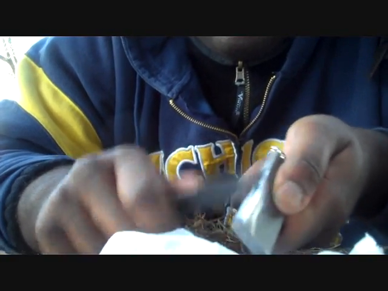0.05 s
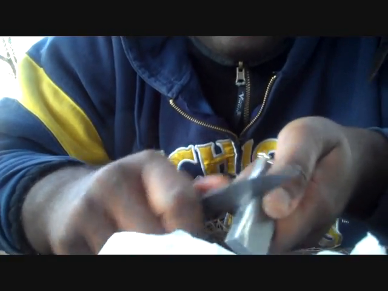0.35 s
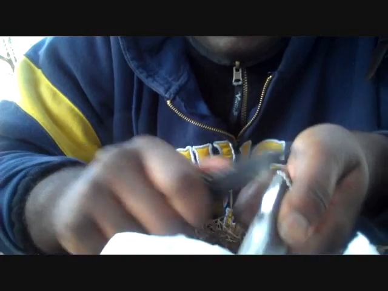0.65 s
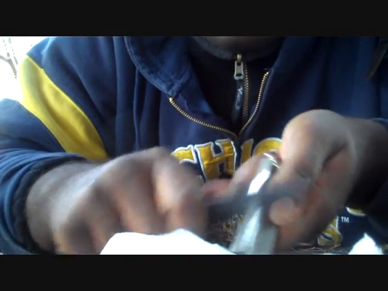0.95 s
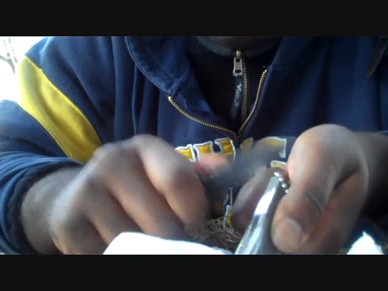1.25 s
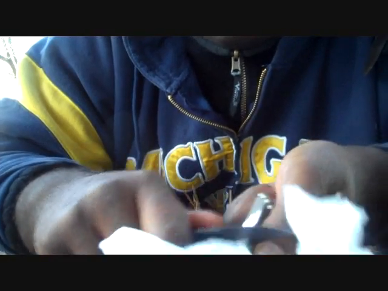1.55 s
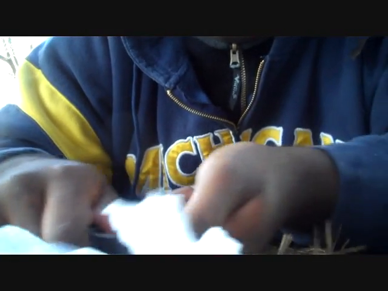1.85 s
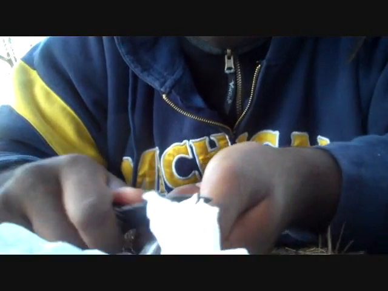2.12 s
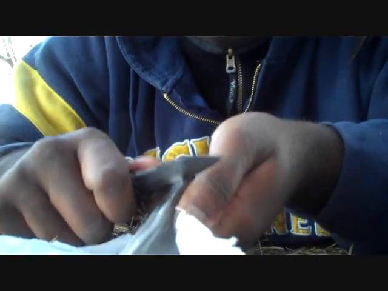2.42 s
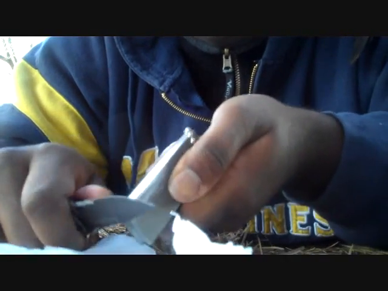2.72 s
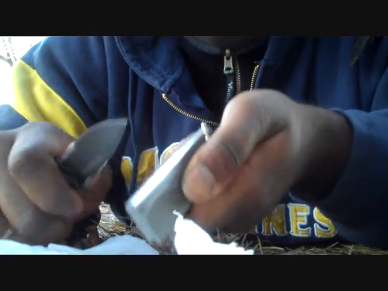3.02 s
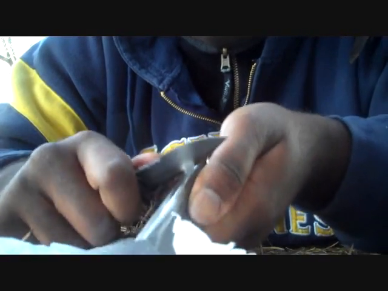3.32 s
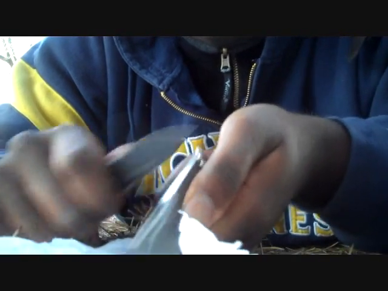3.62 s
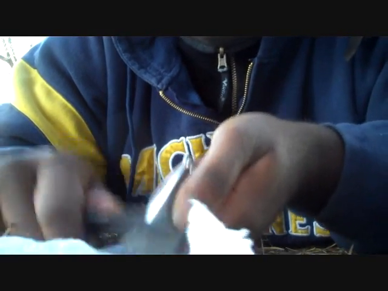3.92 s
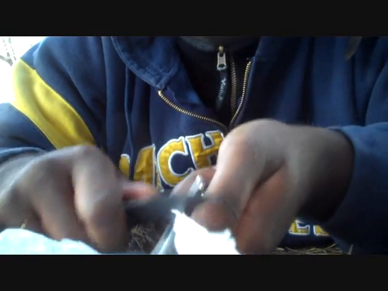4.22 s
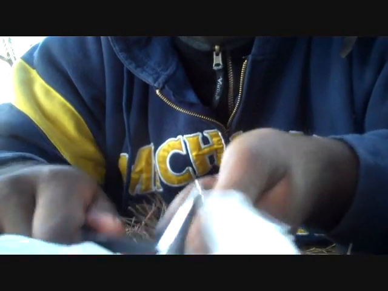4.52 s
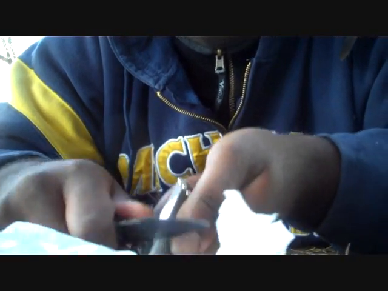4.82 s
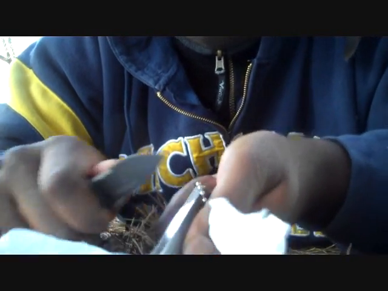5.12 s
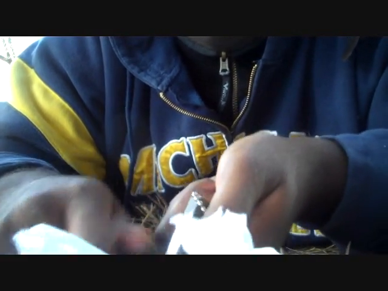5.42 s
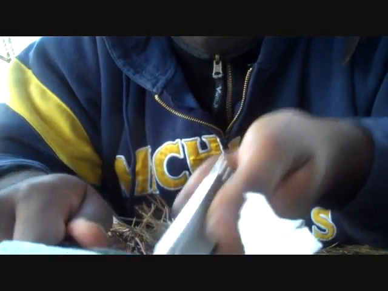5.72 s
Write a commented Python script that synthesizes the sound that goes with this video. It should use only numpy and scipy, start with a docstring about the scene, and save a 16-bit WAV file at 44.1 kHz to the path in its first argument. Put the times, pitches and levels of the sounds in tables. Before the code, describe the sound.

Quick, bright rasps of a knife shaving a metal block alternate with hard metallic taps and tiny high squeaks. Paper crinkles and cloth rustles in a short break, then the strokes return, growing more frequent, with lighter rustling around them. Everything is near a small stereo microphone, and the loudest hits distort slightly. Behind it lie soft open air and the low hum of a far engine.

```python
"""A knife shaves a hand-held magnesium block outdoors, close to a small stereo microphone.
From the start the blade scrapes in stick-slip jerks over a far engine and soft air noise.
From 0.3 s it clacks on the block between strokes and squeals on deep bites; ground and trees scatter it.
Paper and sleeves rustle, most near 1.9 s; at 2.4 s the engine has stepped up in pitch.
Strokes go on to 5.6 s, closer together late on. The loudest peaks overload and duck the gain."""
import sys
import numpy as np
from scipy import signal
from scipy.fft import rfft, irfft
from scipy.io import wavfile
from scipy.ndimage import uniform_filter1d, minimum_filter1d

SR = 44100
rng = np.random.default_rng(int(sys.argv[2]) if len(sys.argv) > 2 else 0)


def persist_wave(psi):
    """Save psi, clipped to +-1, as 16-bit WAV."""
    counts = np.round(np.clip(psi, -1, 1) * 32767).astype(np.int16)
    wavfile.write(sys.argv[1], SR, np.atleast_2d(counts).T)


N = 253575
TIME = np.arange(N) / SR


def undb(db):
    """Decibels to gain."""
    return 10 ** (np.asarray(db) / 20)


def unit(x):
    """Scale to rms 1."""
    return x / np.sqrt(np.mean(x ** 2))


def add(track, start_s, sound):
    """Mix a sound in at start_s."""
    start = max(int(start_s * SR), 0)
    track[..., start:start + sound.shape[-1]] += sound[..., :N - start]


def band(x, hz, width_hz):
    """One resonance, gain 1 at centre."""
    return signal.lfilter(*signal.iirpeak(hz, hz / width_hz, fs=SR), x)


def colour(x, points, size=4096):
    """Minimum-phase filter through points of freq_hz, gain_db."""
    hz, db = np.transpose(points)
    grid_hz = np.maximum(np.fft.rfftfreq(size, 1 / SR), 1)
    gain = undb(np.interp(np.log(grid_hz), np.log(hz), db))
    cepstrum = irfft(np.log(gain))
    cepstrum[1:size // 2] *= 2
    cepstrum[size // 2 + 1:] = 0
    return signal.fftconvolve(x, irfft(np.exp(rfft(cepstrum))))[:len(x)]


def walk(rate_hz):
    """Smooth random drift, rms 1."""
    hold = max(int(SR / rate_hz), 1)
    steps = np.repeat(rng.standard_normal(N // hold + 1), hold)
    return unit(uniform_filter1d(steps, hold)[:N])


def grains(rate_hz, spread_db):
    """Tiny random impacts of uneven size, rms 1."""
    size = undb(spread_db * np.clip(rng.standard_normal(N), -2, 2))
    return unit((rng.random(N) < rate_hz / SR) * size * rng.choice([-1, 1], N))


def ring(x, modes, widen=1.04):
    """Drive steep two-stage resonances; rms 1."""
    return unit(sum(undb(db) * band(band(x, hz, widen * width_hz), hz, widen * width_hz)
                    for hz, width_hz, db in modes))


def pressure(rise_s, fall_s, light_db, end_db=17.5, lift_s=0.0086):
    """One stroke: contact slack below the deepest bite, and the lift-off fade."""
    t = np.arange(int((rise_s + fall_s) * SR)) / SR
    approach_db = light_db * np.maximum(1 - t / rise_s, 0) ** 1.7
    run_out_db = end_db * np.maximum((t - rise_s) / fall_s, 0) ** 1.5
    return approach_db + run_out_db, np.minimum((t[-1] - t) / lift_s, 1)


def scrapes(flex_db=-1, edge_db=1, shavings_db=-14, snag_db=-8, apart_db=-12):
    """The edge sticks, slips and snags on ridges; each slip rings the blade and tears off metal."""
    # blade strokes: start_s, rise_s, fall_s, level_db, light_start_db, flex_rel_db, edge_share_db
    strokes = [(0.0, .003, 0.021, -18, -1, -7, -4.5), (0.08, 0.019, 0.042, -25.5, 6, -3, -4.5),
               (0.407, .07, 0.036, -13, 19.5, -16, -9), (0.564, 0.028, .011, -14, 17, -0.5, -3),
               (1.013, 0.051, 0.046, -15.5, 7.5, -17.5, -8.5), (1.618, 0.028, 0.041, -19, 21, -9.5, -4),
               (2.628, 0.076, 0.041, -12, 14, -17, -7.5), (3.494, 0.037, 0.04, -8, 18.5, -31, -7),
               (3.805, 0.03, 0.026, -19.5, 28, -6, -10), (3.933, 0.026, 0.065, -17.5, 0.5, -10, -7.5),
               (4.125, 0.0012, 0.065, -20, -2, -7.5, -13), (4.326, 0.058, 0.019, -19, 17, -11, -3),
               (4.46, 0.048, 0.034, -19, 12, -13.5, -5.5), (4.793, 0.069, 0.045, -15.5, 24, -12, -6),
               (4.958, 0.056, 0.033, -15.5, 13, -13, -2.5), (5.112, 0.0017, 0.022, -22, 2, -14, 0),
               (5.391, 0.0018, 0.022, -20.5, 0, -7, -3.5), (5.491, 0.061, 0.022, -19, 18.5, -13, -5)]
    # blade resonances while cutting: freq_hz, nominal_width_hz, level_db
    flex_modes = [(1745, 150, 9.5), (1820, 200, 4)]
    body_modes = [(3400, 600, -13), (4020, 690, 2.5), (4300, 410, 3), (5190, 410, 2), (5974, 220, 6)]
    edge_modes = [(7250, 670, 0.0037), (7010, 820, 0.0078)]
    # hiss of tearing shavings: freq_hz, gain_db
    hiss_colour = [(300, -13), (1200, 2.5), (2500, 11), (6000, -1), (8500, -3), (10000, -1), (14000, -6.5)]
    jerks = undb(2.8 * walk(rate_hz=400))
    shared = grains(rate_hz=2200, spread_db=1.0) * jerks
    shared += undb(snag_db) * grains(rate_hz=51, spread_db=2.5)
    slips = shared + undb(apart_db) * jerks * rng.standard_normal((2, N))  # ports differ slightly
    flex, body, edge = ring(slips, flex_modes), ring(slips, body_modes), ring(slips, edge_modes)
    hiss = np.sqrt(jerks) * rng.standard_normal((2, N))
    shavings = unit(np.array([colour(port, hiss_colour) for port in hiss]))
    out = np.zeros((2, N))
    for start_s, rise_s, fall_s, db, light_db, flex_rel_db, share_db in strokes:
        slack_db, lift = pressure(rise_s, fall_s, light_db)
        here = int(start_s * SR) + np.arange(len(slack_db))
        bite_db = db - slack_db
        # light contact favours edge and flex; deep bites tear more metal
        edge_share = np.minimum(undb(share_db + 0.25 * slack_db), .9)
        body_share = np.sqrt(1 - edge_share ** 2)
        blade = body_share * body[:, here] + undb(edge_db) * edge_share * edge[:, here]
        bending = undb(flex_db + flex_rel_db + 0.26 * slack_db) * flex[:, here]
        tearing = undb(shavings_db + 0.1 * (bite_db + 18)) * shavings[:, here]
        add(out, start_s, lift * undb(bite_db) * (blade + bending + tearing))
    return out


def afterring(x, level_db=-14):
    """One lightly damped blade mode sings on after each stroke."""
    return undb(level_db) * band(x, hz=4170, width_hz=7)


def hands(x, level_db=-14, count=110):
    """Faint reflections off hands and sleeves, within 2.5 ms."""
    echoes = rng.standard_normal(count) * np.hanning(count)
    return undb(level_db) * signal.fftconvolve(x, echoes / np.linalg.norm(echoes))[:N]


def surroundings(x, level_db=-29, delay_s=.012, slow_t60_s=0.34, fast_t60_s=0.07, count=16000):
    """Ground and trees scatter a thin, late tail."""
    t = np.arange(count) / SR
    tail = band(rng.standard_normal(count), hz=3800, width_hz=3300) * (t > delay_s)
    tail *= undb(-60 * t / slow_t60_s) + 0.7 * undb(-60 * t / fast_t60_s)
    return undb(level_db) * signal.fftconvolve(x, tail / np.linalg.norm(tail))[:N]


def engine():
    """Far engine: two wavering harmonics of the firing rate."""
    # engine drone: time_s, firing_hz, first_harmonic_db, second_harmonic_db
    drone = [(0, 73, -48, -53.5), (.85, 74, -46.5, -42), (1.4, 74, -48, -53), (2.3, 74, -47, -58),
             (2.4, 98, -49, -54), (3.3, 98, -45.5, -53.5), (3.7, 98, -43, -55), (4.6, 98, -44.5, -62),
             (5.75, 99, -53, -79)]
    time_s, *columns = np.transpose(drone)
    firing_hz, first_db, second_db = (np.interp(TIME, time_s, column) for column in columns)
    phase = 2 * np.pi * np.cumsum(firing_hz * (1 + 0.0251 * walk(rate_hz=22))) / SR
    first = undb(first_db + 1.3 * walk(rate_hz=12)) * np.sin(phase)
    second = undb(second_db + 2 * walk(rate_hz=24)) * np.sin(2 * phase)
    return np.sqrt(2) * (first + second)


def air(level_db=-42, side_db=-8):
    """Soft, steady outdoor noise, mostly alike in both channels."""
    # open-air spectrum: freq_hz, gain_db
    air_colour = [(15, -33.5), (25, -22), (87, 1.5), (168, -7.5), (257, -11), (540, -11), (868, -8),
                  (1400, -17), (2080, -20.5), (3000, -28.5), (6000, -30.5), (9000, -39), (14000, -45)]
    mid, side = (unit(colour(rng.standard_normal(N), air_colour)) for _ in range(2))
    return undb(level_db + 0.5 * walk(rate_hz=16)) * (mid + undb(side_db) * np.array([side, -side]))


def strike(t60_s, flex_db, crack_db, count=2200):
    """One blow on the hand-damped modes, with a crack of contact noise."""
    # modes of blade and block pressed together: freq_hz, level_db
    contact_modes = [(1770, -17.5), (2850, -14.5), (3420, -12), (4280, -15.5), (4850, -17.5), (5850, -3),
                     (6750, -4.5), (7450, -12.5)]
    t = np.arange(count) / SR
    hz, db = np.transpose(contact_modes)
    hz = hz * (1 + 0.027 * rng.standard_normal(len(hz)))
    db[0] += flex_db  # lowest mode: blade flex
    weights = undb(db) * rng.choice([-1, 1], len(hz))
    modes = weights @ np.sin(2 * np.pi * np.outer(hz, t))
    crack = undb(crack_db) * unit(band(rng.standard_normal(count), hz=7500, width_hz=4200))
    return (modes + crack) * undb(-60 * t / t60_s)


def catches(level_db=-6, skid_db=-9, skid_decay_s=0.00039, count=220):
    """The edge taps the block or snags on a ridge, then skids briefly."""
    # light touches and hard snags: start_s, level_db, flex_rel_db
    touches = [(0.1096, -7, 13), (0.4781, -5, 14), (0.5014, -5, 4), (0.5855, -9, -13), (0.593, -13, -4),
               (0.9784, -6.5, 11), (2.2313, 1, 2), (2.626, -1.5, -8), (2.6362, 4, 0), (2.6438, -2, -8),
               (3.014, -5.5, 9.5), (3.0227, -10, 7), (3.493, 2, 1.5), (3.9426, -27, -8),
               (4.0519, -19, 17.5), (4.3912, -11, 19), (4.512, 3.5, 11.5), (5.3916, -6, 3),
               (5.457, -5, -10), (5.5558, 1, 6)]
    out, fade = np.zeros(N), np.exp(-np.arange(count) / SR / skid_decay_s)
    for start_s, db, flex_db in touches:
        force = undb(skid_db) * fade * rng.standard_normal(count) * (rng.random(count) < .1)
        force[0] = 1  # first contact
        blow = strike(t60_s=0.011, flex_db=flex_db, crack_db=-18)
        add(out, start_s, undb(db + level_db) * np.convolve(force, blow))
    return out


def clacks(ring_db=-2, modes_db=-1, count=2200):
    """The blade lands hard; the contact point decides which mode rings most."""
    # landings on the block: start_s, level_db, ring_hz, t60_s
    landings = [(0.2926, 14, 6030, 0.0077), (0.7918, 12.5, 5820, 0.0067), (1.4028, 13, 6125, 0.0082),
                (2.8631, 8, 7650, 0.0053), (3.2356, 3, 3280, 0.0082), (3.7888, 13, 5810, 0.0061),
                (4.1243, 1, 4460, 0.011), (4.76, 14.5, 6090, 0.0045), (5.1096, 2.5, 6670, 0.013),
                (5.3255, 5.5, 6020, 0.0091)]
    out, t = np.zeros(N), np.arange(count) / SR
    for start_s, db, ring_hz, t60_s in landings:
        strongest = undb(ring_db) * np.sin(2 * np.pi * ring_hz * t) * undb(-60 * t / t60_s)
        blow = undb(modes_db) * strike(t60_s, flex_db=1.5, crack_db=-10)
        add(out, start_s, undb(db) * (strongest + blow))
    return out


def squeals():
    """Deep bites lock the slips to one mode; the pitch bends, mostly up, as the edge breaks free."""
    # edge chatter: start_s, length_s, start_hz, end_hz, level_db
    chatter = [(0.402, 0.075, 6060, 5930, -19.5), (1.031, 0.021, 4326, 4420, -11.5),
               (1.069, 0.0029, 4470, 5070, 4.5), (1.074, 0.0068, 5240, 6360, -3),
               (2.673, 0.011, 4220, 4330, -6), (2.682, 0.0122, 4180, 4690, 5),
               (3.521, 0.01286, 4145, 4500, 1.5), (3.543, 0.0077, 4100, 4750, -4),
               (3.956, 0.026, 4220, 4350, -10), (3.97, 0.015, 4550, 6200, -11.5),
               (4.129, 0.048, 3300, 3530, -22.5), (4.496, 0.027, 5990, 6500, -13.5),
               (4.5033, .004, 6120, 6600, 1), (4.985, 0.022, 7200, 6880, -12.5),
               (5.019, 0.015, 5030, 6900, -11.5), (5.554, 0.0096, 6150, 5870, -4)]
    drift = .05 * walk(rate_hz=1100)
    flutter = undb(1.1 * walk(rate_hz=600))
    out = np.zeros(N)
    for start_s, length_s, start_hz, end_hz, db in chatter:
        along = np.linspace(0, 1, int(length_s * SR))
        here = int(start_s * SR) + np.arange(len(along))
        hz = (start_hz + (end_hz - start_hz) * along ** 3) * (1 + drift[here])
        swell = signal.windows.tukey(len(along), .5) * flutter[here]
        add(out, start_s, undb(db) * swell * np.sin(2 * np.pi * np.cumsum(hz) / SR))
    return out


def rustle(level_db=0.5, rest_db=-64, left_db=-0.5):
    """Paper and cloth fibres slide in dense grains that swell and fade with each move."""
    # hand moves brushing paper and sleeves: peak_s, level_db, swell_s, fade_s
    brushes = [(0.68, -44.5, 0.11, 0.17), (1.2, -42, 0.026, 0.048), (1.43, -41, 0.095, 0.081),
               (1.66, -29.5, 0.097, 0.086), (1.862, -19, 0.098, 0.11), (2.29, -35, 0.41, 0.093),
               (4.032, -42, 0.026, 0.036), (4.34, -38.5, 0.047, 0.085), (4.57, -35.5, 0.11, 0.18),
               (4.72, -36.5, 0.075, 0.21), (5.05, -30, 0.027, 0.082), (5.44, -28, 0.056, 0.13),
               (5.7, -37, 0.28, 0.31)]
    # rustle spectrum: freq_hz, gain_db
    rustle_colour = [(240, -37.5), (400, -28.5), (600, -11), (686, -21.5), (912, -11.5), (983, -26.5),
                     (1110, -14), (1610, -9), (2770, -5.5), (3220, -7), (7330, 5), (9900, -13),
                     (14400, -20)]
    # stereo width, greatest in the treble: freq_hz, side_minus_mid_db
    side_colour = [(2800, -21.5), (5000, -5.5), (8000, -6.5), (11000, -3.5)]
    power = undb(rest_db) ** 2
    for peak_s, db, swell_s, fade_s in brushes:
        away = np.maximum((peak_s - TIME) / swell_s, (TIME - peak_s) / fade_s)
        swell = np.exp(-away ** 1.47)  # exponent: 1 pointed, 2 round
        power = power + (undb(db) * swell) ** 2
    mid, side = (unit(colour(grains(rate_hz=6000, spread_db=6.5), rustle_colour)) for _ in range(2))
    side = colour(side, side_colour)
    pair = undb([[left_db], [-left_db]]) * (mid + np.array([side, -side]))
    flutter_db = 1.6 * walk(rate_hz=80)
    return np.sqrt(power) * undb(level_db + flutter_db) * pair


def creases(level_db=-1, decay_s=0.0022, count=500):
    """Paper creases snap: short, bright noise bursts."""
    # crease snaps: start_s, level_db
    snaps = [(0.615, -11), (0.708, -10.5), (1.617, -3.5), (1.713, -1), (1.732, 3), (1.7822, 1),
             (1.9997, -4), (2.2911, -6), (4.668, -7.5), (4.6806, -7), (5.595, -3)]
    out, fade = np.zeros(N), np.exp(-np.arange(count) / SR / decay_s)
    for start_s, db in snaps:
        add(out, start_s, undb(db + level_db) * fade * rng.standard_normal(count))
    return band(out, hz=6350, width_hz=1110)


def gain_control(x, allowed_ms=3, db_per_ms=2.06, deepest_db=9, start_db=7, recover_db_per_s=45):
    """Gain starts low; overload longer than a clack ducks it. It holds, then recovers."""
    knee, memory_s, hold_s, lag_s = .7, .05, 0.16, .012
    hot = np.clip((np.abs(x) - knee) / (1 - knee), 0, 1).mean(axis=0)
    hot_ms = 1000 * signal.lfilter([1 / SR], [1, -np.exp(-1 / (memory_s * SR))], hot)
    wanted_db = np.clip(db_per_ms * (hot_ms - allowed_ms), 0, deepest_db)
    hold = int(hold_s * SR)
    held_db = -minimum_filter1d(-wanted_db, hold, origin=(hold - 1) // 2)
    recovery_db = recover_db_per_s * TIME
    duck_db = np.maximum.accumulate(np.maximum(held_db + recovery_db, start_db)) - recovery_db
    return x * undb(-np.interp(TIME - lag_s, TIME, duck_db))


def overload(x, sag, knee=0.59, bias_hz=900):
    """The overdriven input stage loses upper headroom; the lopsided clipping thumps."""
    excess = np.tanh(2 * np.maximum(np.abs(x) - knee, 0))
    bias = signal.lfilter(*signal.butter(1, bias_hz, fs=SR), excess)
    return np.clip(x, -1, 1 - sag * bias)


def scene(squeal_spill_db=-10):
    """Knife and paper close by, their reflections, engine and air."""
    blows, squeal = scrapes() + clacks() + catches(), squeals()
    knife = blows + squeal
    left, right = knife + afterring(knife) + creases() + rustle()
    near = np.array([np.r_[0, left[:-1]], right])  # hands one sample nearer the right port
    spill = blows + undb(squeal_spill_db) * squeal  # the blade beams its squeal forward: less scatters
    scattered = np.array([hands(direct) + surroundings(spilt) for direct, spilt in zip(knife, spill)])
    return near + scattered + engine() + air()


def record(dry, port_top_hz=14400, top_hz=15558):
    """Microphone chain: port colour, gain ducking, overload (more on the left), treble cut."""
    # unequal resonances of the two ports: freq_hz, left_minus_right_db
    port_balance = [(2500, -0.5), (4600, -1), (5800, -5.5), (6500, 6), (7500, 15.5), (9500, 11),
                    (14000, 15.5)]
    hz, lean_db = np.transpose(port_balance)
    left_share = 1 / (1 + undb(-lean_db))
    ports = [colour(x, np.c_[hz, 20 * np.log10(2 * share)])
             for x, share in zip(dry, [left_share, 1 - left_share])]
    port_lowpass = signal.ellip(8, .2, 50, port_top_hz, fs=SR, output="sos")
    left, right = gain_control(signal.sosfilt(port_lowpass, ports))
    clipped = np.array([overload(left, sag=1.395), overload(right, sag=0.084)])
    return signal.sosfilt(signal.ellip(8, .2, 70, top_hz, fs=SR, output="sos"), clipped)


dry = scene()
out = record(dry)
persist_wave(out)
```